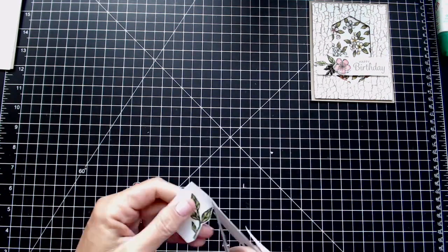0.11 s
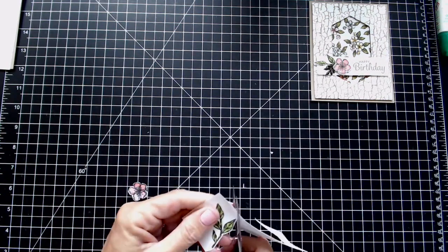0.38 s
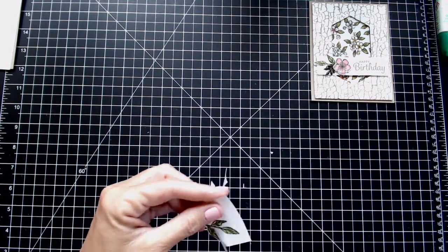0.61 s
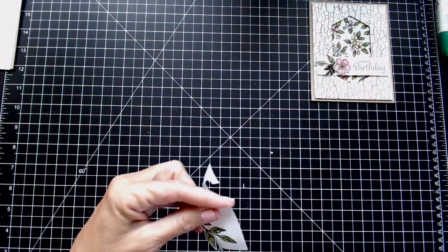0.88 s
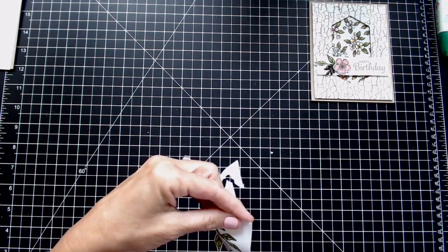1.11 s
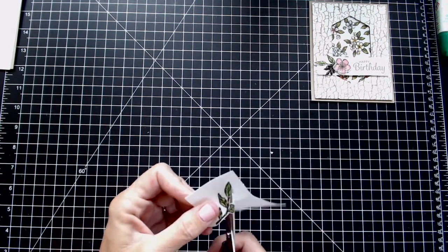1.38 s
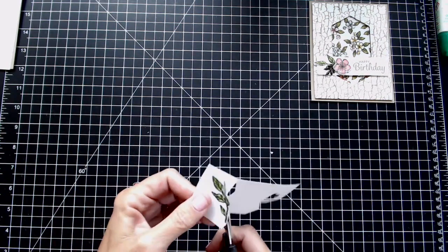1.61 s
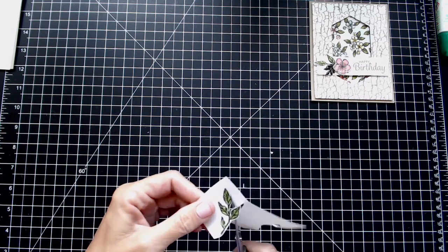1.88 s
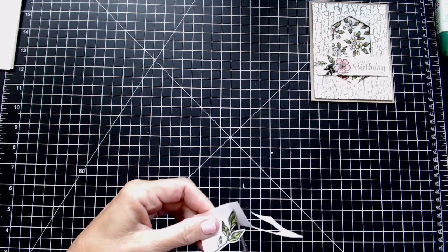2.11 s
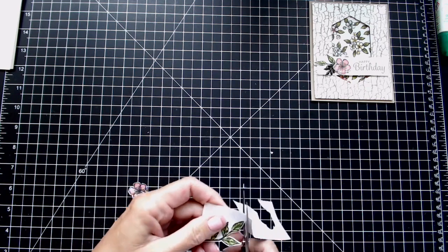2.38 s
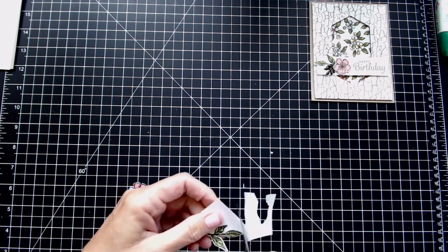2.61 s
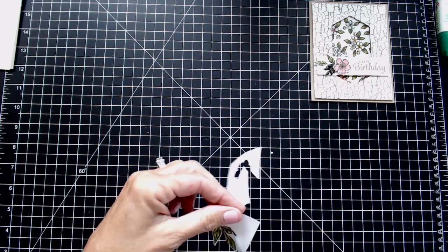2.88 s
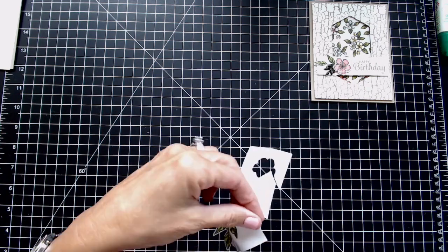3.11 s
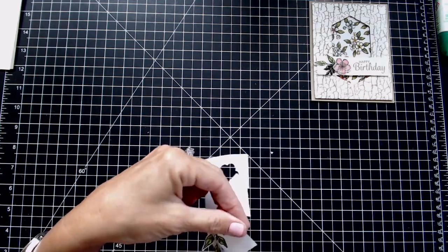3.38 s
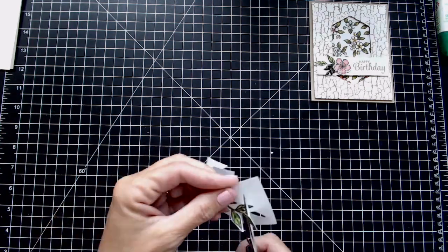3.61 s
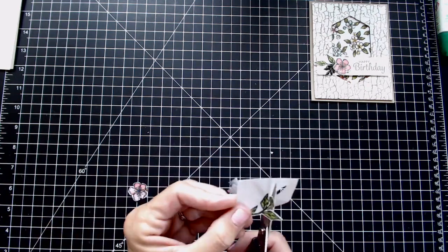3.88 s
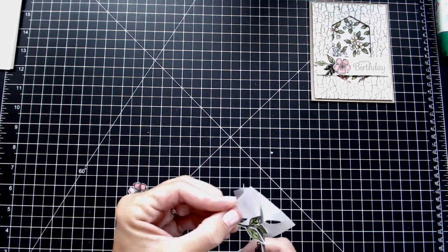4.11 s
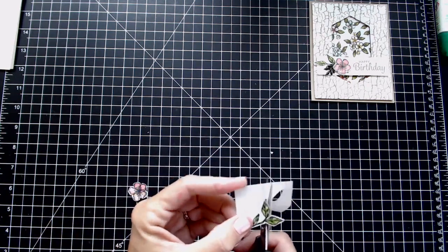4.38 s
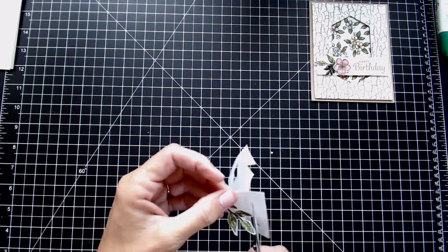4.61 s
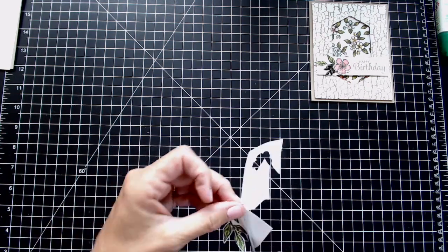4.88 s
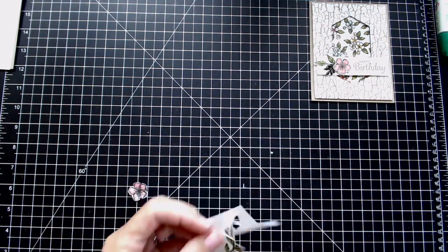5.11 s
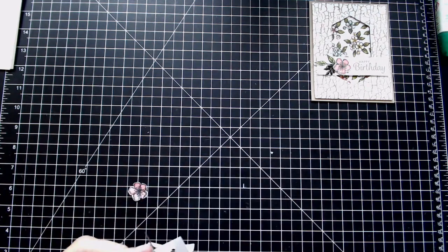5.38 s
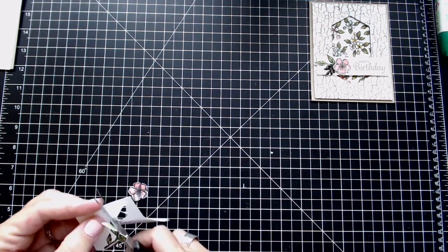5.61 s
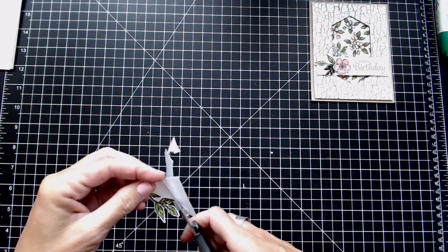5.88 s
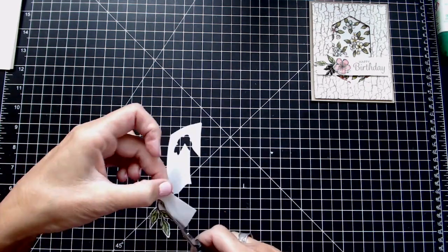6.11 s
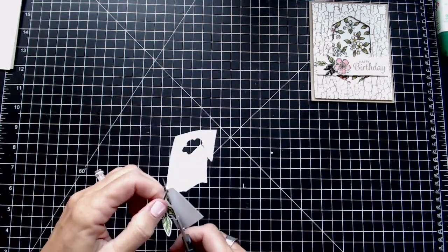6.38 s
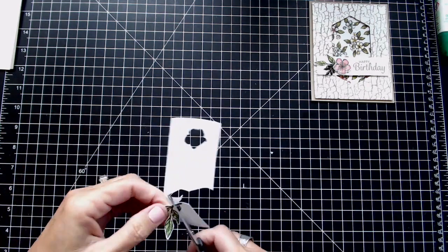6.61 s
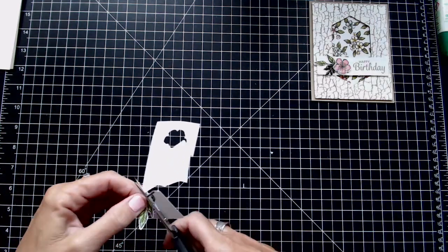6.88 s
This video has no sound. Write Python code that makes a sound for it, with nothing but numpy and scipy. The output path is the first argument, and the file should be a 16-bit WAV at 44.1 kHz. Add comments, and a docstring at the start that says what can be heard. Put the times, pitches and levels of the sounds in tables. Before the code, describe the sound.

Close, dry scissor snips and papery scrapes, sped up and clipped, slightly left, with faint ticks and a few soft desk thuds.

```python
"""Scissors snipping card above a desk

Small scissors snip card close above a desk, left of a stereo microphone: uneven grains and snaps ring modes
of blades and card, with a desk echo and short blade rings. Dull low noise bumps give body to some cuts, or are
card and hand landing. A quiet room adds noise-made rumble and a thin whine. The scene plays fast, in butted
24 ms pieces: joins chop cut edges near them and snap tails, and the rumble jumps there with a tick."""
import sys
import numpy as np
from scipy import signal
from scipy.fft import irfft
from scipy.io import wavfile
from scipy.ndimage import uniform_filter1d

SR = 44100
rng = np.random.default_rng(int(sys.argv[2]) if len(sys.argv) > 2 else 0)


def gain_from_db(level_db):
    """Turn a decibel level (scalar or array-like) into a linear amplitude factor."""
    decades = np.asarray(level_db, float) / 20
    return 10 ** decades


def unload_wav(signal):
    """Save mono or channel-first audio to the path in sys.argv[1] as 16-bit WAV at rate SR, clipped to [-1, 1]."""
    wavfile.write(
        sys.argv[1],
        SR,
        np.round(np.clip(np.atleast_2d(signal).T, -1, 1) * 32767).astype(np.int16),
    )


N = 308259

# blades shearing and rubbing the card:
# (start [s], end [s], place of peak [0-1], relative peak level [dB], depth [0 thin - 2 dull])
CUTS = [(0.073, .135, 0, -71, 0), (0.186, .352, 1, -71, 0.82), (0.514, .64, 0.4, -61, 0.22),
        (.815, .882, 0.6, -68, 0.2), (1.045, 1.111, 1, -58, 0.15), (1.255, 1.3, 0.3, -56, 0.052),
        (1.3, 1.352, 0.7, -52, 0.28), (1.363, 1.376, 0.76, -46, 0.33), (1.468, 1.489, 0.15, -59, 0),
        (1.51, 1.528, 0.3, -59.5, 0), (1.631, 1.69, 0.4, -59.5, 1.1), (1.695, 1.737, 1, -60, 0.56),
        (1.755, 1.86, 0, -61.5, 0.58), (2.155, 2.235, 0.57, -58, 0), (2.306, 2.4, 0.6, -63.5, 0.88),
        (2.64, 2.761, 0.92, -65.5, 1.1), (2.785, 2.81, 0.8, -64.5, 0.75), (2.975, 3.003, 0.3, -58.5, 0.51),
        (3.085, 3.125, 0.2, -63.5, 0.93), (3.304, 3.352, 0.02, -53, 0.46),
        (3.518, 3.562, 0.38, -53.5, 0.68), (3.572, 3.637, 0.64, -65.5, 0.35), (4.135, 4.183, 0, -51, 0.84),
        (4.275, 4.35, 0.05, -65.5, 0.63), (4.513, 4.596, 0.5, -56.5, 1.5), (4.626, 4.665, 0.9, -69, 0.25),
        (4.689, 4.77, 0.02, -51, 1.02), (4.771, 4.809, 0.5, -56, 1.1), (4.877, 4.954, 0.3, -60, 1.2),
        (5.05, 5.11, 0.34, -59, 0.88), (5.13, 5.185, 0.06, -52.5, 0.72), (5.195, 5.235, 0.5, -56, 0.67),
        (5.235, 5.266, 0.86, -42, 0.32), (5.267, 5.305, 0.07, -47.5, 0.9), (5.313, 5.352, 1, -58, 0),
        (5.565, 5.61, 0.4, -61.5, 0.41), (5.62, 5.735, 0.7, -64, 1.5), (5.805, 5.885, 0.72, -58, 0.77),
        (5.978, 6.02, 0.14, -59, 0), (6.291, 6.33, 0.7, -59, 0), (6.35, 6.395, 0.5, -63.5, 0.68),
        (6.489, 6.58, 0, -64, 0.36), (6.93, 6.975, 0.1, -64.5, 0.44)]
# snaps of blade tips and card: (time [s], relative level [dB], depth [0 thin - 2 dull])
SNAPS = [(1.1373, -35.5, 0.14), (1.1755, -38, 0.29), (1.2618, -39, 0), (1.2905, -49, 0.35), (1.333, -42, 0),
         (1.348, -38, 0), (1.7512, -34, 0.77), (1.7547, -31, 0.88), (2.099, -44.5, 0.11),
         (2.103, -48, 0.22), (2.1472, -37.5, 0.59), (2.168, -40.5, 0.74), (2.19, -36, 0.15),
         (2.234, -41, 0.31), (2.73, -43, 0.61), (2.9676, -39, 0.63), (3.044, -46, 1.1),
         (3.259, -45.5, 0.24), (3.451, -52, 0.73), (3.527, -37, 0.26), (3.545, -51, 1), (3.567, -50, 0.84),
         (3.603, -43, 0.56), (4.1788, -42, 1.6), (4.6917, -41, 1.1), (4.786, -47, 1), (4.838, -45, 0.89),
         (4.875, -40.5, 1.34), (4.912, -52, 0.94), (4.9452, -47, 0.84), (5.129, -34, 1.4),
         (5.273, -34, 0.62), (5.611, -25.5, 0.083), (5.739, -26.5, 0.3), (5.856, -46, 0.67),
         (6.135, -44, 0.19), (6.18, -48, 0.17)]
# modes of blades and card: (frequency [Hz], damping width [Hz], relative level [dB])
LOW_MODES = [(620, 470, -1.5), (1450, 700, -0.5)]
MID_MODES = [(2328, 1390, 0.002), (3080, 960, 0)]
HIGH_MODES = [(4737, 1630, 6.5), (5885, 1500, -3)]
# short rings of a blade: (time [s], relative level [dB], mean frequency [Hz], t60 [s])
PINGS = [(2.205, -57.5, 2200, 0.082), (2.236, -50, 1328, 0.043), (4.692, -46, 1450, 0.028),
         (5.6108, -38.5, 1440, 0.014), (5.6108, -36.5, 4540, 0.0091), (1.7508, -44, 4400, 0.025),
         (1.753, -45.5, 2190, 0.025), (5.268, -47.5, 2420, 0.042)]
# comb of the desk echo, following the height of the hands: (from time [s], mean comb spacing [Hz])
HAND_COMBS = [(0, 2240), (1.0, 2610), (1.315, 2400), (1.42, 2660), (1.58, 1440), (2.26, 2270), (3.2, 1110),
              (3.42, 1510), (3.75, 2700), (4.0, 1370), (4.65, 1430), (4.86, 1045), (5.0, 2300),
              (5.232, 2620), (5.5, 1360), (5.9, 2600), (6.34, 1490)]
# low body of some cuts, and card and hand landing on the desk: (time [s], peak level [dB], centre [Hz])
BUMPS = [(1.27, -54.5, 750), (3.55, -53.5, 598), (5.255, -45.5, 900), (5.291, -60, 894), (5.303, -44, 330),
         (5.347, -38, 189.7), (5.39, -47.5, 450), (5.671, -45.5, 310.3), (5.698, -52.5, 705)]
# room spectrum, fan humps near 35 and 106 Hz: (frequency [Hz], relative level [dB])
ROOM_SPECTRUM = [(12, -21), (24, -1.5), (36, 2), (49, -12.5), (58, -5), (75, -16.5), (106, -4),
                 (140, -12.5), (400, -21), (900, -28), (1700, -42), (4500, -49.5), (6800, -54),
                 (7900, -65.5)]
# left-right likeness of the room: (frequency [Hz], likeness [0-1])
ROOM_LIKENESS = [(60, .99), (470, 0.9), (940, 0.67), (1900, 0.021), (7000, 0.095)]
# the largest jumps at joins: (time [s], jump [dB])
LARGE_JUMPS = [(0.3516, -35), (0.4966, -39.5), (0.737, -38.5), (0.9526, -39.5), (1.6165, -33.5),
               (2.3756, -35), (2.3887, -37), (3.3998, -40.5), (3.6647, -40), (3.786, -38.5), (3.8803, -39),
               (3.9291, -39), (4.809, -40.5), (4.955, -40.5), (5.0499, -33.5), (5.9789, -38), (6.2314, -40)]

FIRST_JOIN_S, PIECE_S, PIECES_PER_S = .0869, .024083, 41  # the joins restart every second
SWELL_DB, FADE_DB = 12, 14  # rise of a cut to its peak, fall after it
CUT_DB_PER_DEPTH, SNAP_DB_PER_DEPTH = 5, 7  # weakening of mode groups away from the depth
GRAINS_PER_S = 8000
ECHO_SHARE, SPACING_WOBBLE = .4, .03  # per bounce; relative change from piece to piece
BUMP_RISE_DB_PER_S, BUMP_FALL_DB_PER_S = 343, 298
ROOM_DB, WHINE_DB = -45.5, -82.5  # rms before the side gains
EDGE_HZ = 7260


def scissors():
    """Fibres part in dense uneven grains; grains and snaps ring the modes."""
    drive = cut_level() * cut_grains()
    add_snaps(drive)
    groups = (LOW_MODES, MID_MODES, HIGH_MODES)
    return sum(ring(drive[:, k], modes, uneven_db=2.2) for k, modes in enumerate(groups))


def cut_level():
    """Swell and fade of each shearing stroke, over a faint rustle of card throughout."""
    level = np.zeros((3, N))
    for start_s, end_s, peak, db, depth in CUTS:
        start_s, end_s = at_join(start_s), at_join(end_s)
        u = np.linspace(0, 1, round((end_s - start_s) * SR))
        stroke_db = np.interp(u, [0, np.clip(peak, 0, 1), 1], [-SWELL_DB, 0, -FADE_DB])
        add(level, start_s, gain_from_db(db + stroke_db) * mode_shares(depth, CUT_DB_PER_DEPTH))
    rustle_db = -91.0 + 10.8 * np.minimum(per_piece(1), 1.5)
    return level + gain_from_db(rustle_db) * gain_from_db([[-3], [1.5], [0]])


def cut_grains():
    """Fibres part at chance moments, in clumps of varying strength."""
    clumps = gain_from_db(3.6 * evened(uniform_filter1d(rng.standard_normal(N), size=120)))
    grains = (rng.random(N) < GRAINS_PER_S / SR) * rng.standard_normal((2, 3, N))
    return evened(clumps * spread(grains, apart=0.38))


def add_snaps(drive):
    """One hard knock opens a snap, then a crack and a flutter of the card; the next join chops the tail."""
    t = np.arange(1300) / SR
    knock = 6.5 * (t == t[8])
    crack = np.minimum(t / .0007, 1) * gain_from_db(-60 * t / 0.0075)
    flutter = gain_from_db(-11.5 - 60 * t / 0.054)
    joins = join_times()
    noises = rng.standard_normal((len(SNAPS), 2, 1, len(t)))
    for (s, db, depth), noise in zip(SNAPS, noises):
        burst = knock + (crack + flutter) * spread(noise, apart=0.4)
        burst = burst * (s + t < min(joins[joins > s]))
        add(drive, s, gain_from_db(db - 8.5) * burst * mode_shares(depth, SNAP_DB_PER_DEPTH))


def mode_shares(depth, db_per_depth):
    """Gains of low, middle and high modes, unit energy: depth 0 favours the high ones, 2 the low ones."""
    group_depths = np.array([[2], [1], [0]])
    gains = gain_from_db(-db_per_depth * abs(group_depths - depth))
    return gains / np.linalg.norm(gains)


def ring(drive, modes, uneven_db):
    """Soft-starting modes of unit total energy, driven unevenly by a random gain for each mode and piece."""
    t, out, energy = np.arange(800) / SR, 0, 0
    for (hz, width_hz, db), chance in zip(modes, per_piece(len(modes))):
        decay = t * np.exp(-np.pi * width_hz * t)
        mode = gain_from_db(db) * evened(decay * np.sin(2 * np.pi * hz * t))
        uneven_drive = drive * gain_from_db(uneven_db * chance)
        out = out + signal.oaconvolve(uneven_drive, mode[None], axes=1)[:, :N]
        energy += np.sum(mode ** 2)
    return out / np.sqrt(energy)


def spread(noise, apart):
    """Card and blades radiate from different spots: a share of the noise differs between left and right."""
    common, differing = noise
    return np.array([common + apart * differing, common - apart * differing]) / np.sqrt(1 + apart ** 2)


def desk(x):
    """Direct sound plus two bounces between desk and hands."""
    n, (s, hz) = np.arange(N), np.transpose(HAND_COMBS)
    spacing_hz = hz[np.searchsorted(s[1:], n / SR)] * (1 + SPACING_WOBBLE * per_piece(1)[0])
    lag = SR / spacing_hz  # samples
    once, twice = (np.array([np.interp(n - k * lag, n, side) for side in x]) for k in (1, 2))
    echoed = x + ECHO_SHARE * once + ECHO_SHARE ** 2 * twice
    return echoed / np.sqrt(1 + ECHO_SHARE ** 2 + ECHO_SHARE ** 4)


def pings():
    """Blade rings: each starts softly, wavers a little in pitch and dies."""
    t, out = np.arange(3000) / SR, np.zeros(N)
    for s, db, hz, t60_s in PINGS:
        waver_hz = 60 * evened(uniform_filter1d(rng.standard_normal(len(t)), size=200))
        carrier = np.sqrt(2) * np.sin(2 * np.pi * np.cumsum(hz + waver_hz) / SR)
        add(out, s, np.minimum(t / 0.001, 1) * gain_from_db(db - 60 * t / t60_s) * carrier)
    return out


def sides(x):
    """The right side hears the scissors a little early, and late once the hands have moved."""
    n = np.arange(N)
    lead = np.where(n < 5.5 * SR, 1, -2)  # samples
    return np.array([x[0], np.take(x[1], n + lead, mode="clip")])


def low_bumps():
    """Dull low noise bumps, each with its own pitch: low body of some cuts, and card and hand landing."""
    t, out = np.arange(N) / SR, 0
    for s, db, hz in BUMPS:
        drop_db = np.maximum(BUMP_RISE_DB_PER_S * (s - t), BUMP_FALL_DB_PER_S * (t - s))
        out = out + gain_from_db(db - drop_db) * noise_band(hz, 450)
    return out


def room():
    """Steady rumble and hiss, nearly mono in the bass, with a thin fuzzy whine."""
    hz = np.fft.rfftfreq(N, 1 / SR)
    a, b, c, d = rng.standard_normal((4, len(hz)))
    same = np.clip(read(ROOM_LIKENESS, hz), 0, 1)
    left = a + 1j * b
    right = same * left + np.sqrt(1 - same ** 2) * (c + 1j * d)
    spectrum = np.array([left, right]) * gain_from_db(read(ROOM_SPECTRUM, hz))
    rumble = gain_from_db(ROOM_DB) * evened(irfft(spectrum, N))
    whine = gain_from_db(WHINE_DB) * noise_band(5490, 200)
    return rumble * gain_from_db([[.5], [-.5]]) + whine * gain_from_db([[1.5], [-1.5]])


def ticks():
    """The rumble steps up or down at each join and drifts back; most steps are small."""
    small_s = [s for s in join_times() if 0 < s < N / SR]
    steps = np.zeros(N)
    steps[np.round(np.multiply(small_s, SR)).astype(int)] = gain_from_db(-50.0) * rng.standard_normal(len(small_s))
    s, db = np.transpose(LARGE_JUMPS)
    steps[np.round(s * SR).astype(int)] = gain_from_db(db) * rng.choice([-1, 1], len(s))
    drift_s = 0.0023
    return signal.lfilter([1], [1, -np.exp(-1 / (drift_s * SR))], steps)


def join_times():
    """Times of the joins between pieces [s]."""
    seconds = np.arange(-1, N // SR + 1)[:, None]
    return (seconds + FIRST_JOIN_S + PIECE_S * np.arange(PIECES_PER_S)).ravel()


def at_join(s):
    """A cut edge close to a join is moved onto it."""
    joins = join_times()
    nearest = joins[np.argmin(abs(joins - s))]
    return nearest if abs(nearest - s) < .0095 else s


def per_piece(rows):
    """Random normal values that hold for one piece each."""
    joins = join_times()
    return rng.standard_normal((len(joins) + 1, rows))[np.searchsorted(joins, np.arange(N) / SR)].T


def noise_band(hz, width_hz):
    """Slow complex noise carried on a tone, unit rms."""
    r = np.exp(-np.pi * width_hz / SR)
    noise = rng.standard_normal(N) + 1j * rng.standard_normal(N)
    slow = signal.lfilter([1], np.poly([r, r]), noise)
    return evened((slow * np.exp(2j * np.pi * hz * np.arange(N) / SR)).real)


def evened(x):
    """Scales to unit rms."""
    return x / np.sqrt(np.mean(x ** 2) + 1e-20)


def read(points, hz):
    """Interpolates a table along log frequency."""
    f, value = np.transpose(points)
    return np.interp(np.log(hz + 1), np.log(f + 1), value)


def add(mix, s, sound):
    """Adds sound into mix from time s on, in place."""
    part = mix[..., round(s * SR):][..., :sound.shape[-1]]
    part += sound[..., :part.shape[-1]]


def scene():
    """Close scissors, louder on the left, then the bumps and the room."""
    close = sides(desk(scissors()) + pings())
    return close * gain_from_db([[3.8], [.6]]) + low_bumps() + room()


def top_cut(x):
    """Nothing passes above the cut-off."""
    return signal.sosfilt(signal.butter(12, 8050, fs=SR, output="sos"), x)


def record(dry):
    """Ticks at the joins, then the band limit."""
    low_pass = signal.firwin(101, EDGE_HZ, window=("kaiser", 8), fs=SR)
    mix = signal.oaconvolve(dry + ticks(), low_pass[None], "same")
    return top_cut(mix)


dry = scene()
out = record(dry)
unload_wav(out)
```